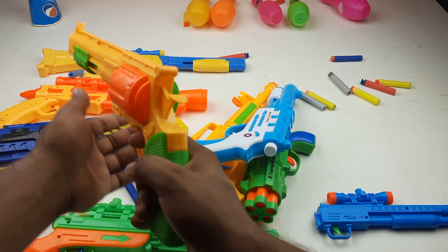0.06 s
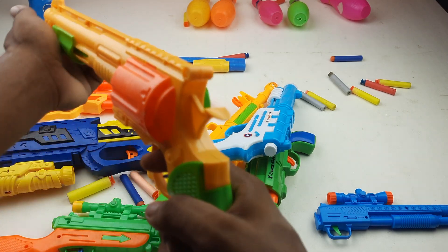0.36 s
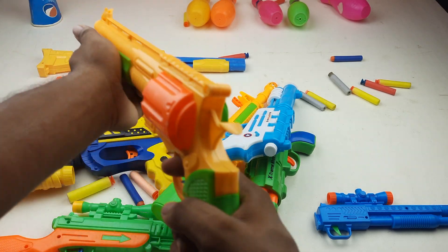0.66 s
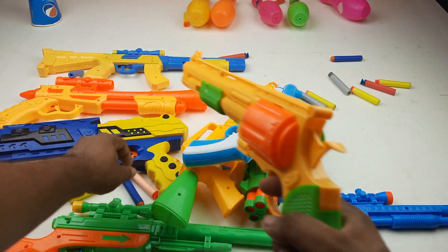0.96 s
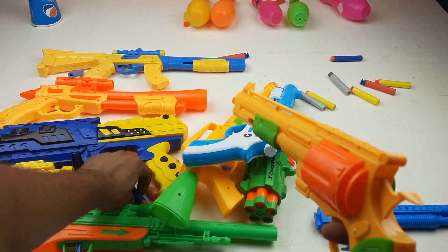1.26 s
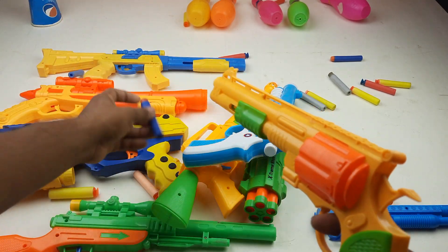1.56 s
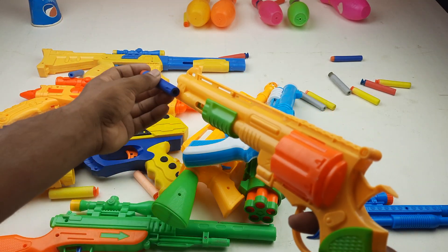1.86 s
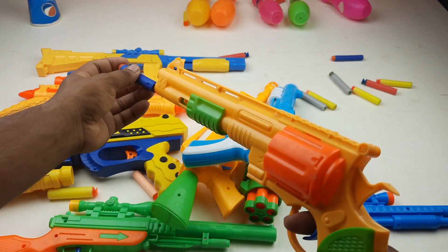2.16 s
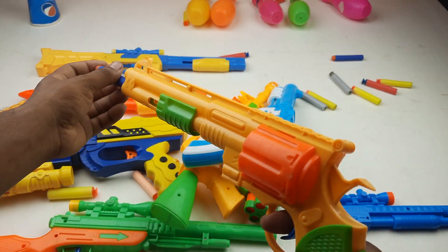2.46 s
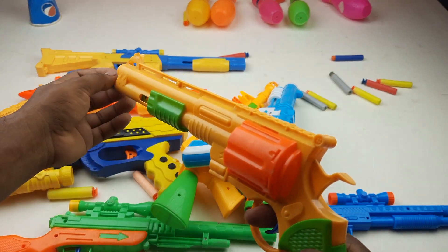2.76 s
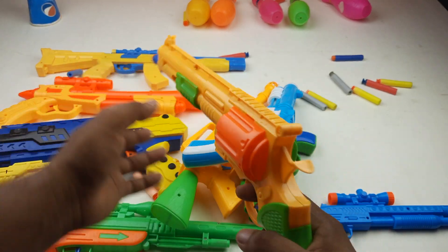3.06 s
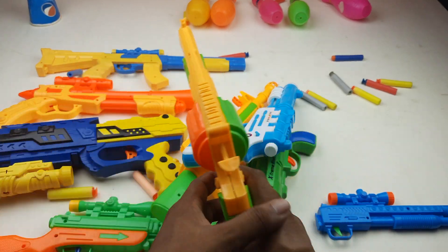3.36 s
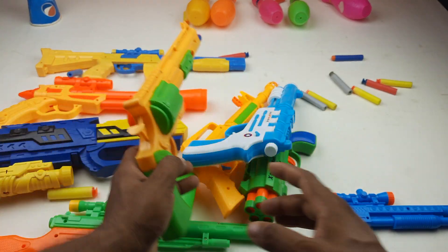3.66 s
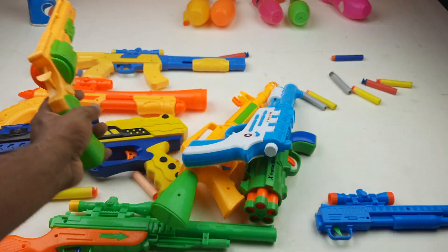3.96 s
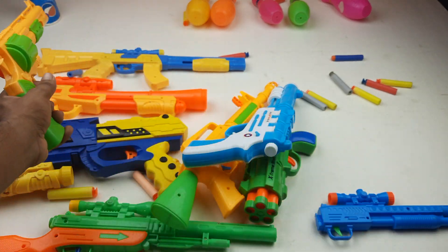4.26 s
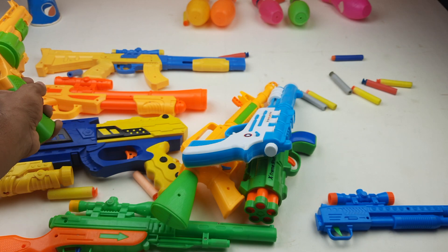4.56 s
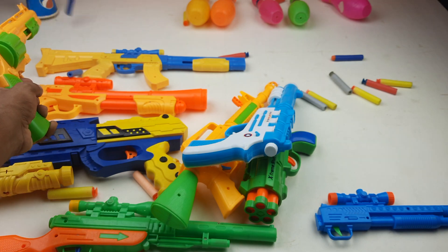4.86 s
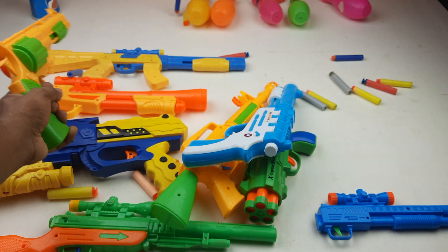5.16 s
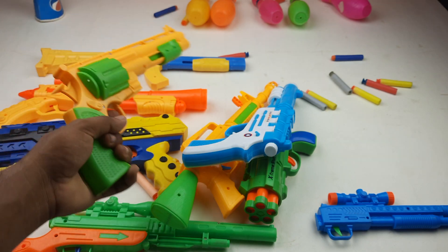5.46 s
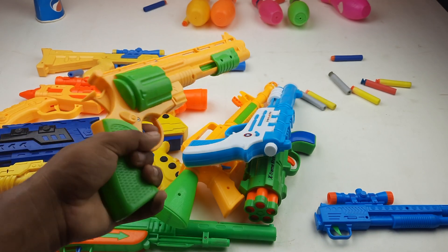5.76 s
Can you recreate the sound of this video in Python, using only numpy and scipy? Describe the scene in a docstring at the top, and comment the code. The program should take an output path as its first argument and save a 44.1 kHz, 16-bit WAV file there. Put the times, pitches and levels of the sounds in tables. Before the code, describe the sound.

A plastic toy revolver clicks as it is cocked, toys bump on a table, then it fires with a snap and a dart tumbles.

```python
"""A small room, a table of hollow toys. A plastic toy revolver is cocked: catches and ratchet teeth click,
its shell rings. A hand bumps about in the pile for a foam dart, ringing the table and jolting the toys,
then rubs the dart into the muzzle. The spring piston fires with a loud snap and a low puff; the dart hits
the wall and tumbles back over the toys in hollow knocks. Behind: room air, a distant fan, microphone hiss
and, at the end, a draught."""
import sys
import numpy as np
from scipy import signal
from scipy.fft import rfft, irfft, next_fast_len
from scipy.io import wavfile

SR = 44100
rng = np.random.default_rng(int(sys.argv[2]) if len(sys.argv) > 2 else 0)


def to_wav(s):
    """Save 16-bit WAV."""
    ch = np.atleast_2d(s).T  # columns
    pcm = np.round(np.clip(ch, -1, 1) * 32767)  # PCM
    wavfile.write(sys.argv[1], SR, pcm.astype(np.int16))


N = 256662
TIME = np.arange(N) / SR
PORT_LAG_S = .00015   # left microphone port hears first
CUTOFF_HZ = 16000

# hand and toys bumping the table: t/s, level/dB
TABLE_BUMPS = [(1.135, -44), (1.165, -48.5), (1.19, -41.5), (1.220, -29.5), (1.248, -38.5), (1.263, -38),
               (1.299, -40), (1.3751, -18.5), (1.396, -27), (1.410, -26.5), (1.4312, -25.5), (1.500, -41.5),
               (1.527, -46.5), (1.610, -56.5), (2.637, -51.5)]
# spectrum of a plastic click: f/Hz, level/dB
CLICK_SPECTRUM = [(30, -30.5), (100, -19), (200, -14.5), (400, -9), (700, -0.5), (1300, 0.5), (2300, -2),
                  (3400, -0.5), (5500, -3), (8000, -4), (9300, -12.5), (12000, -10), (16000, -15.5)]
# spectrum of a dull thud: f/Hz, level/dB
THUD_SPECTRUM = [(50, -18), (150, -8.5), (320, 2.5), (700, -1.5), (1000, -12), (1600, -28), (3000, -33.5),
                 (8000, -56)]


def shot():
    """Sear lets go, piston slams home, spring rebounds; air leaves the barrel with a damped thump."""
    # impacts in the gun: t/s, level/dB, tilt/(dB/oct), f/Hz
    impacts = [(4.8665, -24, 2.5, 7600), (4.8757, -13.5, 0.5, 7351), (4.8780, -17.5, 0.35, 3108),
               (4.8905, -23.5, -1.1, 2238), (4.900, -25, -1, 1240), (4.921, -29, 0, 3124),
               (4.945, -35.5, 0, 3888)]
    # spectrum of the snap: f/Hz, level/dB
    spectrum = [(30, -8), (100, -8.5), (250, -11.5), (600, -6.5), (1000, -0.5), (1800, -3.5), (3000, 0),
                (4500, -2.5), (6300, -7), (8000, -6.5), (9300, -16), (12000, -12.5), (16000, -15.5)]
    snap = snaps(impacts, spectrum, crack_db=-2, crack_s=.0022, part_db=4, left_db=11,
                 ring_tilt_db_oct=-.15, t60_s=.037787, loosening=.5)
    out, t = shell(snap, direct_db=-.5), port_times(.12)
    slam_s, puff_hz = impacts[1][0], 80
    add(out, slam_s, from_db(-27) * np.cos(2 * np.pi * puff_hz * t) * decay(t, t60_s=.027))
    return out


def clicks():
    """Catches, ratchet teeth and other hard plastic parts strike."""
    # contacts: t/s, level/dB, tilt/(dB/oct), f/Hz
    contacts = [(.366, -60.5, 0.5, 1984), (.4585, -55, -3, 1310), (.513, -46, -1.5, 2259),
                (.5335, -36, -2, 1510), (.546, -31, -2, 2421), (.566, -35, -3.5, 1490),
                (.5748, -14, 0.5, 6800), (.5775, -20, -2.5, 2320), (.5785, -25, -2.5, 740),
                (.7412, -39, -3, 2000), (.7598, -45.5, -3, 2100), (1.1345, -56, -3, 1300),
                (1.210, -45, -3, 1480), (1.2215, -42, -1.5, 4700), (1.4614, -42, -2, 5500),
                (2.472, -42.5, 2, 6716), (2.4735, -51.5, -3.5, 2626), (2.636, -52.5, 5.5, 5046),
                (2.665, -50, 1, 2100), (2.757, -58, -3.5, 2400), (2.801, -60, -3.5, 2493),
                (3.335, -67.5, 0, 1700), (5.143, -45.5, -3.5, 1487), (5.290, -49, -4.5, 3700),
                (5.371, -57.5, -4.5, 3520), (5.4305, -43, -3, 3794), (5.503, -53, -2, 5160)]
    return snaps(contacts, CLICK_SPECTRUM, crack_db=3, crack_s=.0015, part_db=6.5, left_db=9,
                 ring_tilt_db_oct=-.5, t60_s=.030956, loosening=.035)


def dart_knocks():
    """The soft tip swells each hollow note in, with a dull thud around it."""
    # dart and what it hits: t/s, level/dB, f/Hz
    knocks = [(2.4704, -50, 522.7), (4.915, -27, 470), (4.9188, -21, 695), (4.938, -28.5, 760.6),
              (5.087, -49, 387.8), (5.1431, -40, 597), (5.147, -36, 316), (5.166, -39.5, 431),
              (5.266, -31, 700), (5.2937, -31, 313), (5.3513, -41.5, 800), (5.372, -37, 361),
              (5.4279, -37, 405.8)]
    out, t = np.zeros((2, N)), port_times(.2)
    for s, level_db, hz in knocks:
        t60_s = .075 * (hz / 500) ** .45
        note = np.sin(2 * np.pi * hz * t) + from_db(-4.5) * noise(t.shape[1], THUD_SPECTRUM)
        add(out, s, from_db(level_db) * note * attack(t, rise_s=.00099) * decay(t, t60_s))
    return out


def table_bumps(soft_contact_s=.0024, firm_db=-25.5):
    """One push and pull of air, then the table rings; soft, long contacts barely stir the high modes."""
    # modes of the loaded table: f/Hz, level/dB, t60/s
    modes = [(76.93, -12, .16), (103.7, -16, 0.28), (142.3, -25.5, 0.16), (312.2, -17, 0.55),
             (391.5, -15, 0.096), (470, -14, 0.043), (550.23, -17.5, 0.15), (637, -17, 0.07),
             (970, -25.5, .07)]
    out, t = np.zeros((2, N)), port_times(.4)
    for s, level_db in TABLE_BUMPS:
        contact_s = soft_contact_s / np.hypot(1, from_db(level_db - firm_db))
        bump = -from_db(-.5) * np.sin(2 * np.pi * t / contact_s) * (t < contact_s)
        for hz, mode_db, t60_s in modes:
            gain = from_db(mode_db + rng.standard_normal()) / np.hypot(1, (hz * contact_s / 1.7) ** 2)
            bump += gain * np.sin(2 * np.pi * hz * t) * decay(t, t60_s)
        bump += from_db(-10) * noise(t.shape[1], THUD_SPECTRUM) * decay(t, t60_s=.0905)
        add(out, s, from_db(level_db) * bump)
    return out


def toy_rattles(delay_s=.003, gain_db=-13, tilt_db_oct=-2.5, hz=4450):
    """Each bump jolts a toy, which clicks just after."""
    jolts = [(s + delay_s, level_db + gain_db, tilt_db_oct, hz) for s, level_db in TABLE_BUMPS]
    return snaps(jolts, CLICK_SPECTRUM, crack_db=4, crack_s=.0015, part_db=3.5, left_db=8,
                 ring_tilt_db_oct=-2, t60_s=.03426, loosening=.1)


def rubbing(rough_db=4, grain_s=.0015, squeak_db=8):
    """Plastic, foam and skin stick and slip in tiny grains that excite the rubbed part's resonance."""
    # strokes: t/s, length/s, level/dB, squeak f/Hz, tilt/(dB/oct)
    strokes = [(0.457, .1, -57.5, 2100, -0.5), (0.528, 0.041, -40.5, 2100, 0), (0.709, .1, -63, 1790, 0),
               (1.214, 0.17, -60.5, 5500, -3.5), (1.22, .03, -52.5, 6020, 5), (1.359, 0.074, -48, 5500, -6),
               (1.499, 0.03888, -57.5, 5960, 0.5), (1.589, 0.044, -61.5, 5960, 5.5),
               (1.823, .05, -72, 6494, 7.5), (1.95, .12, -70.5, 6496, 8.5), (2.432, 0.075, -69.5, 5206, 0),
               (2.467, 0.21, -65.5, 2650, -0.5), (2.629, 0.0585, -53.5, 5984, 4),
               (2.677, 0.17315, -75, 2500, -.5), (2.899, 0.068, -76, 2500, 1.5), (3.3, 0.68, -81, 2096, .7),
               (3.519, .12, -69.5, 2100, .7)]
    # friction spectrum: f/Hz, level/dB
    spectrum = [(200, -9), (800, -5.5), (1500, 0.5), (2400, -2.5), (3700, -1), (5500, -1.5), (8000, -1.5),
                (9300, -10.5), (14000, -9.5), (16000, -12)]
    out = np.zeros((2, N))
    for s, length_s, level_db, hz, tilt_db_oct in strokes:
        t = TIME[:int(length_s * SR)]
        speed = np.abs(np.sin(np.pi * t / length_s)) ** .86
        slips_s = np.arange(0, length_s, grain_s)
        grains = unit_rms(from_db(rough_db * np.interp(t, slips_s, rng.standard_normal(len(slips_s)))))
        friction = noise(len(t), spectrum, tilt_db_oct, hz, squeak_db)
        add(out, s, from_db(level_db) * speed * grains * friction)
    return out


def snaps(contacts, spectrum, crack_db, crack_s, part_db, left_db, ring_tilt_db_oct, t60_s, loosening):
    """Each contact: a short crack, strongest at the left port, then duller, damped plastic modes."""
    out, t = np.zeros((2, N)), port_times(.12)
    full_blow_db = -13   # weaker blows press the parts together less, so they ring longer
    for s, level_db, tilt_db_oct, hz in contacts:
        ring_s = t60_s * from_db(loosening * (full_blow_db - level_db))
        soft_db = -2 * min(tilt_db_oct, 0)   # dull contact: less crack, more of the part's pitch
        ring = noise(t.shape[1], spectrum, tilt_db_oct + ring_tilt_db_oct, hz, part_db + soft_db)
        ring *= decay(t, ring_s)
        crack = noise(t.shape[1], spectrum, tilt_db_oct + 1.5, hz, part_db / 2)
        crack *= from_db(crack_db - soft_db) * np.exp(-t / crack_s) * pan(left_db)
        add(out, s, from_db(level_db) * (ring + crack) * attack(t, rise_s=.0002))
    return out


def shell(x, direct_db):
    """The hollow plastic body rings on at its resonances."""
    # shell modes: f/Hz, width/Hz, level re direct/dB
    modes = [(602.02, 42, 1), (1271.5, 22, 3.5), (1440.6, 74, -2.5), (2013.1, 34, -0.5), (2154.2, 23, 1.5),
             (2350, 55, 2), (2636.5, 90, -1.5), (3100, 120, -3), (3969.2, 15, -8.5), (4680, 700, -9.5),
             (4900, 27, -9), (5500, 18, -6.5), (7490.2, 330, -4), (8195, 170, -4)]
    out = x.copy()
    for hz, width_hz, level_db in modes:
        radius = np.exp(-np.pi * width_hz / SR)
        b = np.array([1, 0, -1]) * (1 - radius ** 2) / 2
        a = [1, -2 * radius * np.cos(2 * np.pi * hz / SR), radius ** 2]
        out += from_db(level_db) * signal.lfilter(b, a, x + 1e-18)
    return from_db(direct_db) * out


def room(x, wet_db, treble_db_oct, bass_db, build_s):
    """Adds a diffuse tail that builds quickly and dies sooner in the treble."""
    # room decay: f/Hz, t60/s
    decay_times = [(80, 0.28), (300, 0.38), (700, 0.19), (2500, .25), (6000, 0.2), (14000, 0.18)]
    t = TIME[:SR // 2]
    white, hz = rfft(noise(len(t))), np.arange(len(t) // 2 + 1) * 2
    octaves_hz = 62.5 * 2 ** np.arange(9)
    tail = 0
    for centre_hz in octaves_hz:
        band = irfft(white * at_hz(np.c_[octaves_hz, octaves_hz == centre_hz], hz), len(t))
        feed_db = treble_db_oct * max(np.log2(centre_hz / 2000), 0) + bass_db * (centre_hz < 1000)
        tail += band * from_db(feed_db) * decay(t, at_hz(decay_times, centre_hz))
    tail *= 1 - np.exp(-(t / build_s) ** 2)
    return x + from_db(wet_db) * signal.fftconvolve(x, unit_rms(tail) / np.sqrt(len(t)), axes=1)[:, :N]


def background(draught_start_s=5.635, draught_rise_s=.07045):
    """Room air, a distant fan, microphone hiss and a draught at the left port."""
    # noise spectra and fan tones: f/Hz, level/dB
    air_spectrum = [(20, -40.5), (32, -16), (46, -2), (68, -2), (100, -10.5), (135, -6.5), (200, -15),
                    (420, -13.5), (640, -15.5), (780, -21), (960, -29.5), (1300, -29), (2400, -36.5),
                    (6000, -51.5), (12000, -75.5)]
    hiss_spectrum = [(1000, -29.5), (4000, -22.5), (6600, -20), (7200, -4), (7750, -1.5), (8300, -4.5),
                     (9100, -23), (10500, -17.5), (16000, -20.5)]
    draught_spectrum = [(20, -14), (55, 4), (95, 3), (160, -12.5), (300, -18), (1000, -60)]
    fan_tones = [(67, -75), (420, -79.5), (497, -85.5), (613, -78), (1822, -95.5)]
    air = from_db(-66.5) * noise(N, air_spectrum)
    fan = sum(from_db(db) * np.sin(2 * np.pi * (hz * TIME + rng.random())) for hz, db in fan_tones)
    hiss = from_db(-79) * noise(N, hiss_spectrum)
    onset = np.clip((TIME - draught_start_s) / draught_rise_s, 0, 1)
    draught = from_db([[-46], [-64]]) * onset * noise(N, draught_spectrum)
    return (air + fan) * pan(3.1) + hiss * pan(.5) + draught


def noise(size, spectrum=None, tilt_db_oct=0, peak_hz=1000, peak_db=0):
    """Unit-rms stereo noise with one broad resonance; the ports are alike only in the bass."""
    # likeness of the ports: f/Hz, left-right correlation
    likeness = [(60, 0.84), (300, 0.92), (600, .8), (1200, 0.12), (2500, 0.067), (8000, 0.05)]
    n = next_fast_len(size)
    hz = np.arange(n // 2 + 1) * SR / n
    mid, side = np.exp(2j * np.pi * rng.random((2, len(hz))))
    alike = at_hz(likeness, hz)
    bins = np.sqrt(1 + alike) * mid + np.sqrt(1 - alike) * side * [[1], [-1]]
    bins[1] *= np.exp(-2j * np.pi * hz * PORT_LAG_S)
    if spectrum:
        resonance_db = peak_db / (1 + ((hz / peak_hz - 1) / .13) ** 2)
        tilt_db = tilt_db_oct * np.log2(np.maximum(hz, 500))
        bins *= from_db(at_hz(spectrum, hz) + resonance_db + tilt_db) * (hz < CUTOFF_HZ)
    return unit_rms(irfft(bins, n)[:, :size])


def from_db(db):
    return 10 ** (np.asarray(db) / 20)


def unit_rms(x):
    return x / np.sqrt(np.mean(x ** 2) + 1e-20)


def attack(t, rise_s):
    return 1 - np.exp(-t / rise_s)


def decay(t, t60_s):
    return from_db(-60 * t / t60_s)


def at_hz(points, hz):
    """Interpolate on a log-frequency axis."""
    known_hz, values = np.transpose(points)
    return np.interp(np.log(hz + 1), np.log(known_hz), values)


def pan(left_db):
    return from_db([[left_db / 2], [-left_db / 2]])


def add(out, start_s, sound):
    i = int(start_s * SR)
    out[:, i:i + sound.shape[1]] += sound[:, :N - i]


def port_times(length_s):
    """Time since a sound reached each port."""
    return np.maximum(TIME[:int(length_s * SR)] - np.array([[0], [PORT_LAG_S]]), 0)


def high_pass(x, edge_hz):
    return signal.sosfilt(signal.butter(3, edge_hz, "high", fs=SR, output="sos"), x)


def scene():
    """Gun, table and dart in one small room, all a little to the left."""
    handling = shell(clicks() + toy_rattles() + rubbing(), direct_db=-3.5)
    handling = room(handling, wet_db=-7.5, treble_db_oct=-1.2, bass_db=-4, build_s=.0055)
    firing = room(shot(), wet_db=-5.5, treble_db_oct=-.43, bass_db=-4, build_s=.013)
    bumps = room(table_bumps(), wet_db=-2.5, treble_db_oct=1.5, bass_db=0, build_s=.011)
    bumps = high_pass(bumps, edge_hz=72)   # the table top radiates no deep bass
    dart = room(dart_knocks(), wet_db=-5, treble_db_oct=1, bass_db=-1, build_s=.011)
    return firing * pan(1) + handling * pan(2.9) + (bumps + dart) * pan(3.2) + background()


def record(dry):
    """The microphone sheds the deepest bass; the top is cut steeply."""
    low_pass = signal.ellip(10, .1, 80, CUTOFF_HZ, fs=SR, output="sos")
    return signal.sosfilt(low_pass, high_pass(dry, edge_hz=30))


dry = scene()
out = record(dry)
to_wav(out)
```